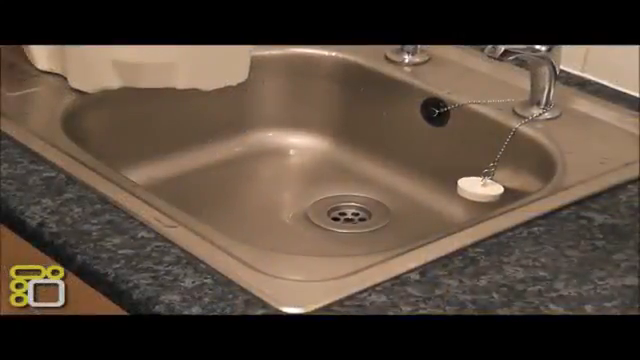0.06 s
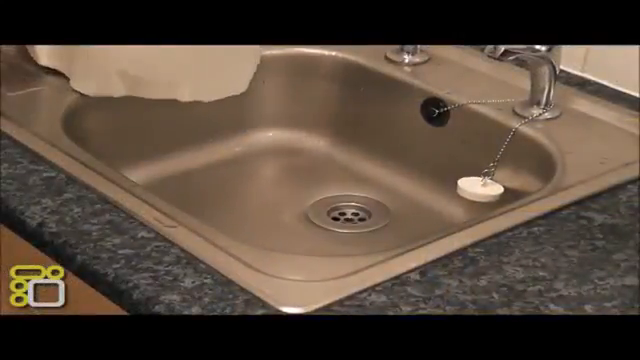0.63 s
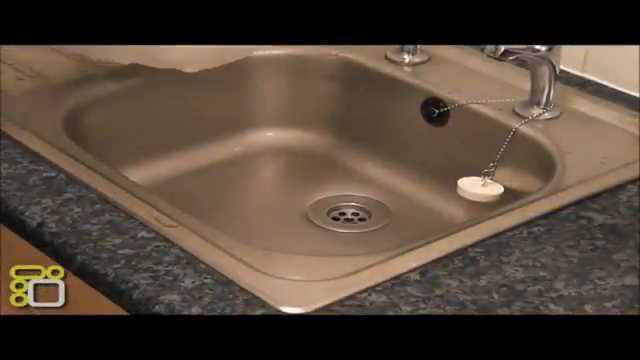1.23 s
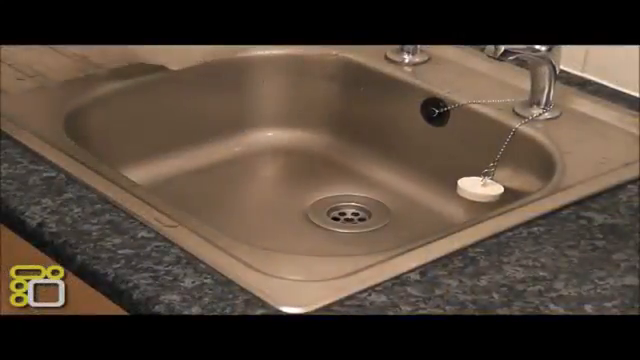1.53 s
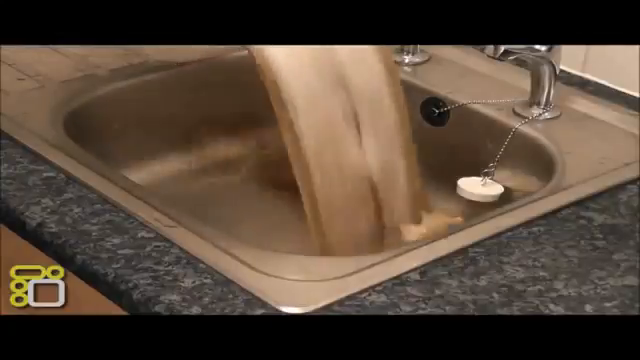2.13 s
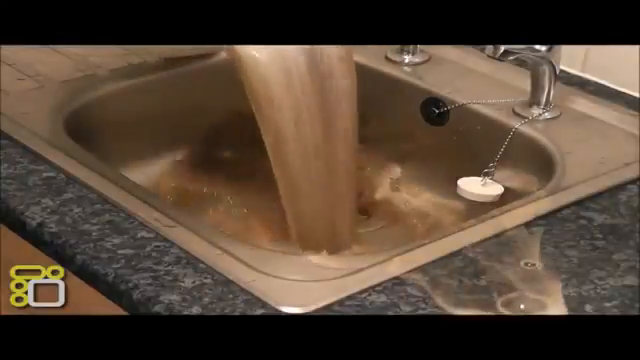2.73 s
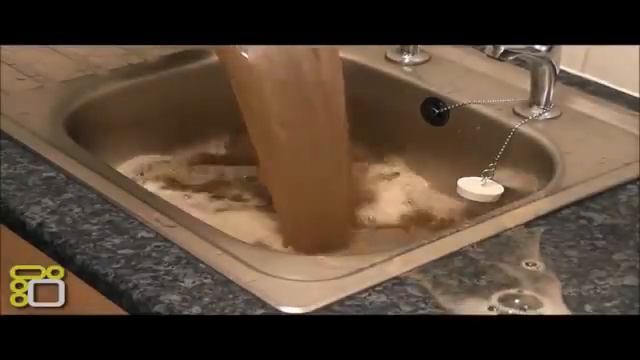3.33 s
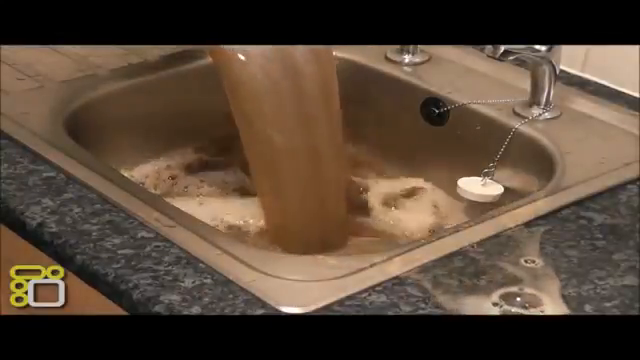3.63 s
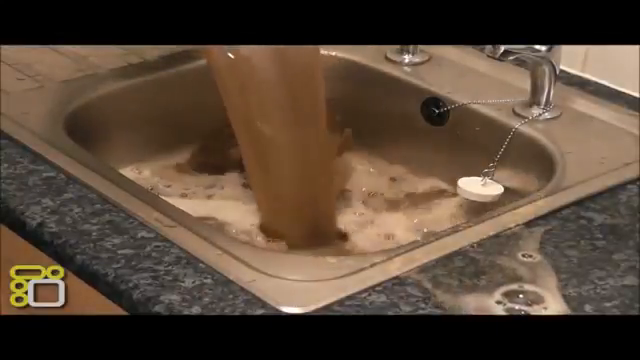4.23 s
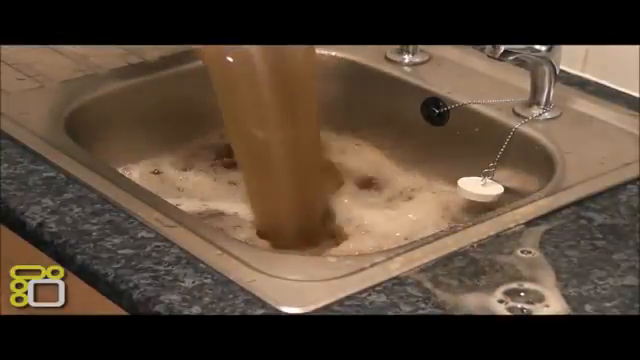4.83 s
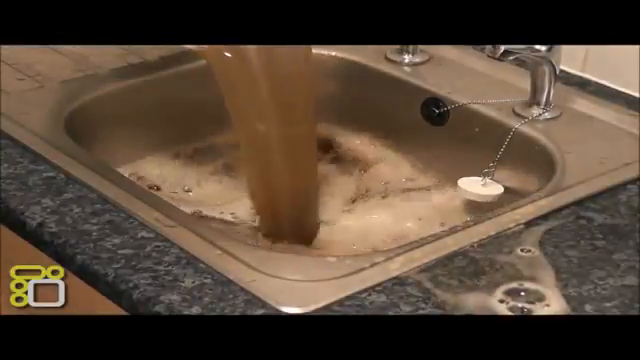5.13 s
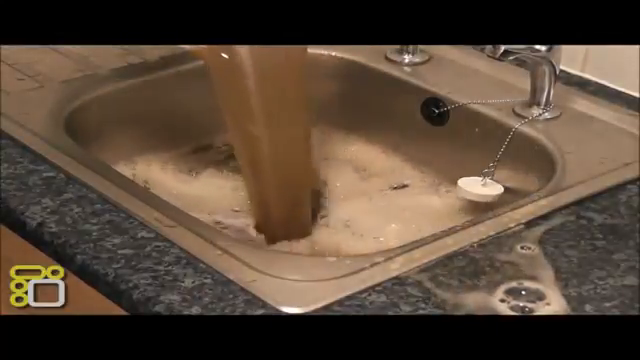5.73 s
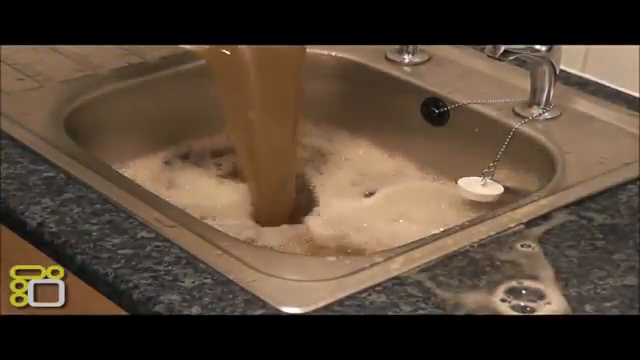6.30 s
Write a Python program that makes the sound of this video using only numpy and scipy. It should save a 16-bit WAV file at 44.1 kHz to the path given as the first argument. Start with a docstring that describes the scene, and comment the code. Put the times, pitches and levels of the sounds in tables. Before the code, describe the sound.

After some plastic scraping, squeaks and a hollow knock, a thick stream of water pours into a metal sink, splashing and bubbling.

```python
"""A thick stream of water pours from a plastic tank into a steel kitchen sink.
It slaps the bare basin, drives its modes and throws spray; as a foamy pool builds up, the drumming
and mist fade and the resonance of trapped air bubbles takes over. Before it is tipped out, the tank
scrapes and squeaks by stick-slip friction and knocks on the rim. A small hard kitchen reverberates."""
import sys
import numpy as np
from scipy import signal
from scipy.fft import rfft, irfft
from scipy.io import wavfile
from scipy.ndimage import uniform_filter1d

SR = 44100
rng = np.random.default_rng(int(sys.argv[2]) if len(sys.argv) > 2 else 0)


def output_pcm(signal):
    """Save a mono or channel-first signal as 16-bit PCM at the path in sys.argv[1].

    Samples are clipped to [-1, 1] before scaling.
    """
    pcm = np.clip(np.atleast_2d(signal).T, -1, 1) * 32767
    wavfile.write(sys.argv[1], SR, np.round(pcm).astype(np.int16))


N = 289296

BREAK_S = 2.23   # the water first slides as a smooth sheet, then breaks against the front wall


def from_db(db):
    """Decibels to amplitude ratio."""
    return 10 ** (np.asarray(db) / 20)


def rms_one(x):
    """Normalisation to rms 1."""
    return x / np.sqrt(np.mean(x ** 2) + 1e-20)


def steady(x):
    """Running normalisation to rms 1 over 1/8 s; the fast grain remains."""
    return x / np.sqrt(uniform_filter1d(np.mean(x ** 2, axis=0), SR // 8) + 1e-12)


def envelope(rows):
    """Gain interpolated through rows (t/s, level/dB), zero outside their span."""
    s, db = np.transpose(rows)
    return from_db(np.interp(np.arange(N) / SR, s, db, left=-np.inf, right=-np.inf))


def at_hz(points, hz):
    """Interpolation along log frequency."""
    knots_hz, values = np.transpose(points)
    return np.interp(np.log(hz + 1e-9), np.log(knots_hz), values)


def drift(rate):
    """Linear interpolation through 1000 Gaussian values, `rate` a second."""
    return np.interp(np.arange(N) / SR * rate, np.arange(1000), rng.standard_normal(1000))


def ramp(start_s, takes_s):
    """Linear transition from 0 to 1."""
    return np.clip((np.arange(N) / SR - start_s) / takes_s, 0, 1)


def swell(start_s, attack_s, t60, hold_s=0):
    """Linear attack to 1, hold and exponential release."""
    age = np.maximum(np.arange(N) / SR - start_s - attack_s - hold_s, 0)
    return ramp(start_s, attack_s) * np.exp(-np.log(1000) * age / t60)


def decay(t60):
    """Half a second of exponential damping."""
    return np.exp(-np.log(1000) * np.arange(SR // 2) / SR / t60)


def free_mode(hz, db, t60):
    """Free vibration of one mode: a damped sinusoid."""
    return from_db(db) * np.sin(2 * np.pi * hz * np.arange(SR // 2) / SR) * decay(t60)


def colour(x, spectrum):
    """Minimum-phase filter, obtained by folding the cepstrum of the given spectrum."""
    size = 4096
    hz = np.arange(size // 2 + 1) * SR / size
    cepstrum = irfft(np.log(from_db(at_hz(spectrum, hz))))
    cepstrum[1:size // 2] *= 2
    cepstrum[size // 2 + 1:] = 0
    return signal.oaconvolve(x, irfft(np.exp(rfft(cepstrum))))[:N]


def band(x, low_hz, high_hz, order=2):
    """Butterworth band-pass."""
    return signal.sosfilt(signal.butter(order, [low_hz, high_hz], "band", fs=SR, output="sos"), x)


def resonate(x, hz, width_hz):
    """Two-pole resonator with unit peak gain."""
    r = np.exp(-np.pi * width_hz / SR)
    feedback = [1, -2 * r * np.cos(2 * np.pi * hz / SR), r * r]
    return signal.lfilter(np.array([1, 0, -1]) * (1 - r * r) / 2, feedback, x)


def add(out, s, sound):
    """Superposition of a sound at time s."""
    at = int(np.clip(s * SR, 0, N - 1))
    out[at:at + len(sound)] += sound[:N - at]


def clicks(per_s, spread_db):
    """Poisson process of impacts, many small and a few large."""
    sizes = from_db(spread_db * np.minimum(rng.exponential(1, N), 6))
    return sizes * rng.choice([-1, 1], N) * (rng.random(N) < per_s / SR)


def bursts(rows, t60, spread):
    """Damped band noise, one burst for each row (t/s, peak level/dB, f/Hz)."""
    out = np.zeros(N)
    for s, db, hz in rows:
        cluster = band(rng.standard_normal(SR // 2), hz / (1 + spread), hz * (1 + spread)) * decay(t60)
        add(out, s, from_db(db) * cluster / np.abs(cluster).max())
    return out


def kitchen(x, wet_db):
    """Reverberation: direct sound plus a diffuse stereo tail that dies sooner in the treble."""
    decay_times = [(100, 0.71), (500, 0.87), (1400, 0.67), (4000, 0.49), (12000, 0.27)]   # reverberation time: f/Hz, T60/s
    # stereo width of the finished sound, wide in the middle, nearly mono from 3 to 11 kHz:
    side_spectrum = [(60, -14.5), (250, -6), (1100, -5), (2000, -7.5), (3000, -22), (5500, -100),
                     (10500, -39), (13000, -4.5)]   # f/Hz, side level/dB
    size, edges = SR // 2, np.geomspace(40, 16000, 14)
    hz = np.arange(size // 2 + 1) * SR / size
    white = rfft(rng.standard_normal((2, size)))
    tail = sum(irfft(white * (hz >= lo) * (hz < hi), size) * decay(at_hz(decay_times, np.sqrt(lo * hi)))
               for lo, hi in zip(edges, edges[1:]))
    tail[:, :SR // 300] = 0   # gap before the first reflection
    tail = from_db(wet_db) * tail / np.sqrt(np.sum(tail ** 2) / 2)
    mid = x + signal.oaconvolve(x, tail[0])[:N]
    side = signal.oaconvolve(x, colour(tail[1], side_spectrum))[:N]
    return np.array([mid + side, mid - side])


def scattered(x, wet_db, spots=6):
    """Moving source: water lands here and there, and each spot has its own room response."""
    spot = np.repeat(rng.integers(0, spots, N // 400 + 1), 400)[:N]
    return sum(kitchen(x * uniform_filter1d(1.0 * (spot == k), 150), wet_db) for k in range(spots))


def room_air():
    """Ambient noise: stationary, and strongest in the bass."""
    spectrum = [(30, 4), (66, -29), (84, 0), (106, 6.5), (160, -3.5), (450, -11.5), (1000, -18),
                (3000, -19), (14000, -27.5)]   # room air: f/Hz, relative level/dB
    return from_db(-51.5) * rms_one(kitchen(colour(rng.standard_normal(N), spectrum), wet_db=4))


def tank_drag():
    """Stick-slip friction: each shove over the drainer gives a grainy rumble and a hiss."""
    shoves = [(-0.06, -42, -45.5), (0.104, -38.5, -43.5), (0.245, -41.5, -65), (0.49, -55, -56.5),
              (0.735, -48.5, -62)]   # each grips at once and slides to rest: t/s, rumble/dB, hiss/dB
    rumble_spectrum = [(80, -27), (170, 0), (280, -4.5), (380, -5.5), (520, -7), (1550, -14), (2400, -25),
                       (4000, -34)]   # coarse friction: f/Hz, relative level/dB
    hiss_spectrum = [(1200, -4), (2000, 0), (3000, -3), (7000, -6), (14000, -12)]   # fine friction: f/Hz, relative level/dB
    slides = np.array([swell(s, attack_s=0.0044, t60=1) for s, _, _ in shoves])
    powers = from_db(np.array(shoves)[:, 1:]) ** 2
    rumble_gain, hiss_gain = np.sqrt(powers.T @ slides ** 2)   # overlapping shoves add in power
    rumble = kitchen(colour(clicks(900, spread_db=-1), rumble_spectrum), wet_db=1.5)
    hiss = kitchen(colour(clicks(6000, spread_db=3.5), hiss_spectrum), wet_db=-3)
    return rumble_gain * rms_one(rumble) + hiss_gain * rms_one(hiss)


def tank_squeaks():
    """Friction-excited oscillation: raspy tones build while the plastic slips, then ring out."""
    slips = [(0.0, 0.068, -52.5, 1710), (0.105, 0.058, -42, 379), (0.24, 0.07, -50.5, 1545),
             (0.656, 0.034, -40, 1599), (0.693, 0.13, -49, 337.4), (0.73, 0.02, -60, 3060),
             (0.739, 0.043, -39.5, 1587)]   # plastic on steel: t/s, hold/s, level/dB, f/Hz
    jitter, rasp_width_hz, flutter_db = 0.016, 130, 3.5
    out = np.zeros(N)
    for s, hold_s, db, hz in slips:
        tone = np.sin(2 * np.pi * np.cumsum(hz * (1 + jitter * drift(260))) / SR)
        rasp = rms_one(band(rng.standard_normal(N), hz - rasp_width_hz / 2, hz + rasp_width_hz / 2))
        gain = from_db(db) * swell(s, attack_s=0.024, t60=0.31, hold_s=hold_s)
        out += gain * (tone + from_db(-12) * rasp)
    return kitchen(out * from_db(flutter_db * drift(220)), wet_db=-11.5)


def tank_knock(at_s=1.0195):
    """Impact excitation: one hard blow chatters on the rim, and the hollow tank vibrates freely."""
    modes = [(425.7, -11.5, 0.52), (485.5, -4, 0.31), (626, 2, 0.12), (690, 2.5, 0.056), (900, 0.5, 0.11),
             (1117, -18, 0.41), (1375, -3.5, 0.15), (1500, -11, 0.13), (1800, -6, 0.14), (2080, -12, 0.2),
             (2200, -15.5, 0.2), (2730, -19, 0.2)]   # tank modes: f/Hz, relative level/dB, T60/s
    crack_spectrum = [(120, -16), (220, 0), (320, -2), (420, 5), (620, 6), (900, 2), (1150, -4), (1500, 3),
                      (2200, -1), (2900, -2.5), (3400, -17), (5200, -15), (6700, -13.5), (8000, -20),
                      (14000, -22)]   # contact noise: f/Hz, relative level/dB
    crack, ring = np.zeros((2, N))
    chatter = from_db(-8) * rng.standard_normal(SR // 2) * decay(0.047)
    contact = signal.unit_impulse(SR // 2) + chatter
    add(crack, at_s, from_db(-39.5) * rms_one(colour(contact, crack_spectrum)))
    add(ring, at_s, sum((-1) ** k * free_mode(*mode) for k, mode in enumerate(modes)))
    return kitchen(crack, wet_db=-1.5) + from_db(-23) * kitchen(ring, wet_db=-6.5)


def tank_clinks():
    """Light impacts ring briefly in narrow treble bands as the tank tips."""
    contacts = [(1.542, -38, 10300), (1.607, -37, 5300)]   # clinks: t/s, peak level/dB, f/Hz
    return kitchen(bursts(contacts, t60=0.033, spread=0.062), wet_db=-6)


def thuds():
    """Soft impacts excite only low frequencies: the tank, then the first water, shakes the basin."""
    blows = [(0.118, -35.5, 0.18, 156, 203), (0.249, -39, 0.18, 150, 400), (0.607, -42, 0.48, 75, 258),
             (1.505, -40, 0.097, 460, 720), (1.682, -31.5, 0.21, 160, 300), (1.798, -37, 0.12, 140, 450)]   # dull blows: t/s, level/dB, T60/s, lowest f/Hz, highest f/Hz
    out = np.zeros(N)
    for s, db, t60, low_hz, high_hz in blows:
        shake = band(band(rng.standard_normal(SR // 2), low_hz, high_hz, order=1), 40, 1100)
        add(out, s, from_db(db) * rms_one(shake) * decay(t60))
    return kitchen(out, wet_db=-4.5)


def floor_slap(at_s=1.6805):
    """Free vibration of a plate: the first slug of water sets the basin floor booming."""
    modes = [(49, -41, 0.68), (107.8, -36.5, 1), (168, -26, 0.13), (428, -43, 0.55)]   # modes of the bare floor: f/Hz, level/dB, T60/s
    out = np.zeros(N)
    add(out, at_s, sum(free_mode(*mode) for mode in modes))
    return out


def drop_snaps():
    """Brief impacts radiate treble: lone drops snap on the steel."""
    drops = [(2.0802, -12.5), (2.67, -21), (2.932, -11), (2.961, -11), (2.98, -16), (3.064, -12),
             (3.17, -10.5), (3.307, -12), (3.469, -13), (3.498, -9), (3.672, -14), (5.7, -17), (6.211, -15)]   # drop impacts: t/s, peak level/dB
    out, snap = np.zeros(N), band(signal.unit_impulse(SR // 100), 7000, 12000)
    for s, db in drops:
        add(out, s, from_db(db) * snap / np.abs(snap).max())
    return kitchen(out, wet_db=1)


def splashes():
    """Fragmentation: lumps of water slap (wide band) and break into like-sized bubbles (narrow band)."""
    lumps = [(1.9496, -29, 3140), (2.0474, -27.5, 3460), (2.1521, -25.5, 2560), (2.2848, -28, 1720),
             (2.695, -27, 6160), (2.958, -22, 3150), (3.13, -23.5, 5140), (3.394, -25, 3400),
             (4.085, -21.5, 4870), (6.2049, -27.5, 4500)]   # single splashes: t/s, relative level/dB, f/Hz
    cluster = from_db(4) * bursts(lumps, t60=0.087, spread=0.26)
    slap = from_db(2.5) * bursts(lumps, t60=0.064, spread=1)
    return kitchen(cluster + slap, wet_db=-2.5)


def plops():
    """Bubble resonance: a big bubble rings as an upward-gliding tone and sheds three weaker ones."""
    big_bubbles = [(1.512, -33.5, 399), (2.288, -22, 1824), (2.313, -24.5, 1130), (2.781, -23, 2320),
                   (3.069, -21, 5140), (3.182, -29, 1033), (3.343, -30, 1450), (3.389, -26, 1310),
                   (3.45, -26.5, 1620), (3.569, -26.5, 621), (3.576, -20.5, 6720), (3.825, -22.5, 3900),
                   (3.955, -25, 3010), (3.961, -26, 1006), (4.031, -21.5, 4240), (4.327, -23, 1354),
                   (4.435, -24.5, 975), (4.476, -22, 1280), (4.737, -24.5, 1856), (4.819, -27, 1054),
                   (4.857, -26, 1510), (5.136, -25, 2250), (5.43, -26, 1284), (5.479, -27.5, 1410),
                   (5.63, -23.5, 1484), (5.7, -24.5, 1304), (6.205, -23, 1505), (6.338, -23.5, 1333)]   # single bubbles: t/s, level/dB, f/Hz
    rise, shed_db, shed_within_s, shed_octaves = 0.024, -8.5, 0.012, 0.273
    out, t = np.zeros(N), np.arange(SR // 2) / SR
    for start, main_db, main_hz in big_bubbles:
        shed = [(start + shed_within_s * rng.random(), main_db + shed_db,
                 main_hz * 2 ** (shed_octaves * rng.uniform(-1.04, 1))) for _ in range(3)]
        for s, db, hz in [(start, main_db, main_hz)] + shed:
            t60 = 0.067 * (1000 / hz) ** 0.44   # small bubbles ring shorter
            tone = np.sin(2 * np.pi * hz * t * (1 + rise * t / t60))
            onset = 1 - np.exp(-hz * t)
            add(out, s, from_db(db) * tone * decay(t60) * onset)
    return kitchen(out, wet_db=-5.5)


def droplets(low_hz, high_hz, per_s, spread_db, clump_db, cycles, sizes=10):
    """Shot noise through resonators: droplets burst in clumps, each size ringing at its own pitch."""
    out = np.zeros(N)
    for hz in np.geomspace(low_hz, high_hz, sizes):
        impacts = clicks(per_s / sizes, spread_db) * from_db(clump_db * np.tanh(drift(60)))
        out += resonate(impacts, hz, 2 * hz / cycles) / np.sqrt(hz)
    return out


def spray():
    """Droplet impacts: spray off the walls merges into a bright patter."""
    spectrum = [(700, -27.5), (1700, -9.5), (2400, -2), (3000, 1), (4200, 3.5), (6000, 0.5), (7200, -17),
                (10000, -58)]   # spray: f/Hz, relative level/dB
    patter = droplets(1310, 8800, per_s=5400, spread_db=2.5, clump_db=5.5, cycles=5.7)
    return from_db(-0.5) * steady(scattered(colour(patter, spectrum), wet_db=-3))


def mist(pool):
    """The smallest droplets ring highest; their hiss weakens as the pool closes."""
    spectrum = [(4000, 0), (6200, 0.5), (7500, -2.5), (9700, -1), (12000, -3), (14200, -4)]   # fine mist: f/Hz, relative level/dB
    hiss = droplets(6020, 13100, per_s=4500, spread_db=2, clump_db=6.5, cycles=9)
    return from_db(1.5 - 4 * pool) * steady(scattered(colour(hiss, spectrum), wet_db=-2.5))


def bubbles(low_hz, high_hz, cycles, rise, spread_db, clump_db, count):
    """Trapped air is a damped oscillator (60 dB in `cycles`) whose pitch rises near the surface."""
    when, pitch, strength = rng.random((count, 3)).T
    at = (when * N).astype(int)
    hz = low_hz * (high_hz / low_hz) ** pitch
    gain = from_db(spread_db * np.minimum(-np.log(strength), 3.5) + clump_db * drift(25)[at]) * hz
    age = np.arange(700)   # samples
    turns = hz[:, None] * age / SR
    tones = np.sin(2 * np.pi * turns * (1 + rise * turns / cycles))
    rings = gain[:, None] * tones * np.exp(-np.log(1000) * turns / cycles)
    return np.bincount((at[:, None] + age).ravel(), rings.ravel(), N)[:N]


def fizz():
    """Lightly damped resonance of tiny bubbles in the foam."""
    foam = bubbles(2778, 10960, cycles=300, rise=0.034, spread_db=2.5, clump_db=8.5, count=900)
    return from_db(-9) * steady(kitchen(band(foam, 3300, 8000, order=1), wet_db=-8))


def gurgle(pool):
    """Air entrainment: bubbles are faint under the smooth sheet and loudest once the pool has closed."""
    spectrum = [(400, -16.5), (560, -10), (800, -9), (980, -4), (1110, -2.5), (1520, 0.5), (1780, 0.3),
                (2080, -2.5), (3000, -3.5), (4500, -18.5)]   # bubble cloud: f/Hz, relative level/dB
    sheet = 1 - ramp(BREAK_S, 0.071)
    cloud = bubbles(451.4, 3623, cycles=38.4, rise=0.084, spread_db=3.5, clump_db=2.2, count=9000)
    gain = from_db(-1 - 7.5 * sheet + 3 * pool)
    return gain * steady(scattered(colour(cloud, spectrum), wet_db=1.5, spots=3))


def basin(flow):
    """Forced vibration: the stream buffets the steel; low modes boom, middle ones drum, top ones clatter."""
    modes = [(49.7, 14, -11, 1), (86, 7.8, 5, -1.5), (105.5, 8.3, 1.5, 11), (149, 14, 2, 3.5),
             (178.7, 10.2, 2.5, -0.5), (244.3, 38, 2.5, 0), (328, 24.5, -0.5, 2), (364.6, 19.5, 3, -5),
             (398.8, 10.6, 3, -2.5), (474, 107, -10.5, -3), (556, 35, -1, -8), (628, 85, -3, 1),
             (970, 51, -2, -8), (1162, 55, -5, -7), (1936, 26, -6.5, 14.5)]   # basin modes: f/Hz, bandwidth/Hz, relative level/dB, deep-water change/dB
    boom_levels = [(1.9, -57), (2.3, -50.5), (4.2, -46.5), (5.35, -54), (5.65, -44.5), (5.95, -54),
                   (6.56, -52)]   # weight of the stream on the lowest modes: t/s, level/dB
    drum_levels = [(1.7, -41.5), (2.02, -43.5), (2.1, -40.5), (2.27, -35.5), (2.45, -33), (2.65, -38.5),
                   (3.0, -42.5), (3.17, -40), (3.55, -42.5), (3.85, -39.5), (4.26, -42.5), (4.45, -45),
                   (6.56, -45.5)]   # drumming, loudest on the bare floor: t/s, level/dB
    push = clicks(2500, spread_db=3.5)
    tilt_db_per_octave = -5 * (1 - ramp(BREAK_S, 0.29))   # the unbroken sheet pushes softly
    deep = ramp(start_s=4.74, takes_s=0.4)
    responses = []
    for k, (hz, width_hz, db, deep_db) in enumerate(modes):
        wander_db = 4 * drift(11)   # the wandering stream stirs now this mode, now that
        gain = from_db(db + tilt_db_per_octave * np.log2(hz / 250) + deep_db * deep + wander_db)
        responses.append((-1) ** k * gain * resonate(push, hz, width_hz))
    boom, drum, clatter = [steady(kitchen(band(sum(group), 41, 2340), wet_db=-11.5))
                           for group in (responses[:3], responses[3:9], responses[9:])]
    bare = swell(BREAK_S, attack_s=0.41, t60=2.7)   # water spreads over the bare floor, then covers it
    clatter_gain = from_db(-8 + 6 * bare) * flow
    return envelope(boom_levels) * boom + envelope(drum_levels) * drum + clatter_gain * clatter


def stream():
    """Amplitude modulation: the surging flow scales the clatter, bubbles, fizz, spray and mist."""
    strength = [(1.91, -46), (2.03, -43.5), (2.09, -40), (2.24, -38), (2.29, -33), (2.7, -30.5),
                (2.88, -34), (3.4, -35.5), (4.0, -33), (5.0, -34.5), (5.35, -36), (6.56, -38)]   # strength of the stream: t/s, level/dB
    glugs = [(1.915, 0.034, 1), (2.04, 0.02, 4.5), (2.268, 0.018, 4.5), (2.983, 0.054, -2.5),
             (3.112, 0.27, 1.5), (3.414, 0.015, -1), (4.616, 0.03, 0), (4.696, 0.27, 1.5),
             (5.197, 0.077, 1.5), (5.476, 0.24, 2), (6.153, 0.063, 1.5), (6.387, 0.071, 2)]   # the tank glugs, the stream swells or slackens: t/s, hold/s, gain/dB
    surge_db = sum(db * swell(s, attack_s=0.0043, t60=0.15, hold_s=hold) for s, hold, db in glugs)
    flow = envelope(strength) * from_db(surge_db)
    pool = ramp(start_s=3.9, takes_s=0.34)   # a foamy pool closes around the stream
    return basin(flow) + flow * (gurgle(pool) + fizz() + spray() + mist(pool))


def scene():
    """Superposition: over the quiet of the room the tank is shifted, then emptied."""
    air = room_air()
    tank = tank_clinks() + tank_drag() + tank_squeaks() + tank_knock()
    return air + tank + thuds() + floor_slap() + stream() + splashes() + plops() + drop_snaps()


def record(dry):
    """Microphone response: one narrow dip and a steep low-pass."""
    dipped = dry - 0.6 * resonate(dry, hz=2528, width_hz=99)
    cutoff_hz = 14250
    return signal.sosfilt(signal.ellip(12, .1, 80, cutoff_hz, fs=SR, output="sos"), dipped)


dry = scene()
out = record(dry)
output_pcm(out)
```